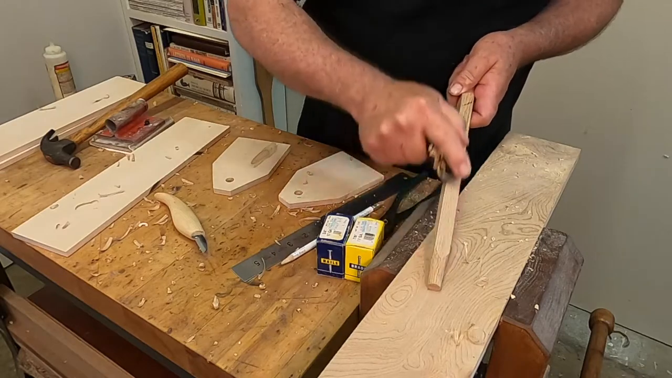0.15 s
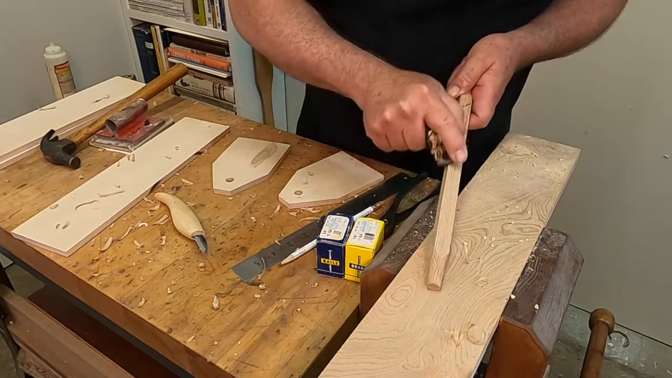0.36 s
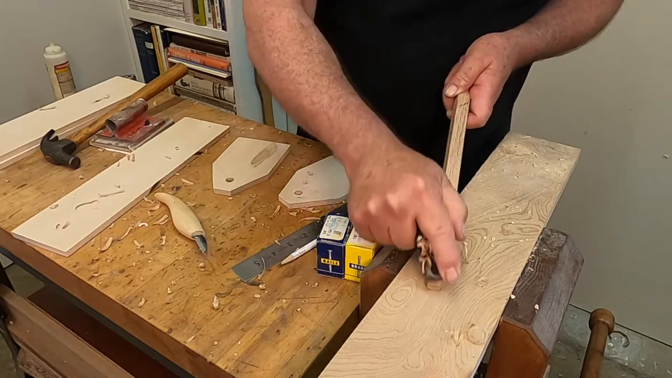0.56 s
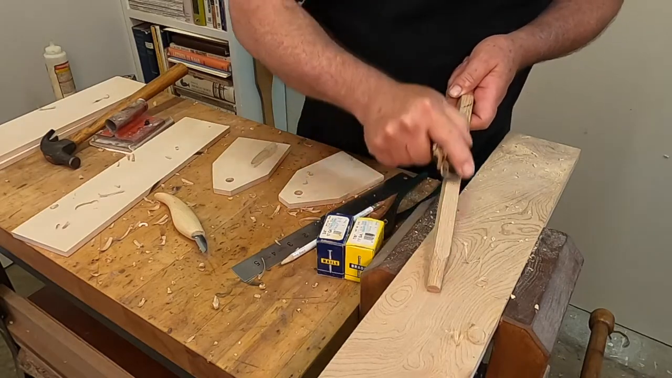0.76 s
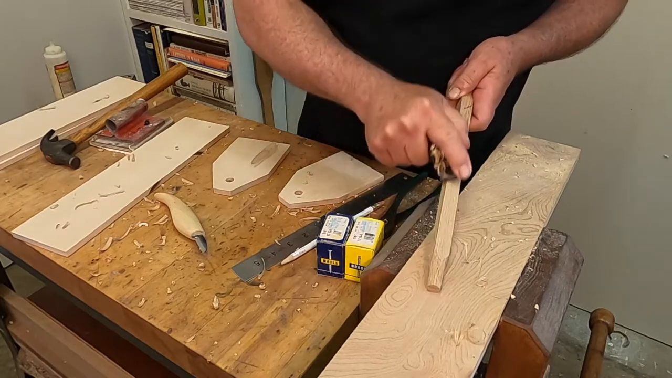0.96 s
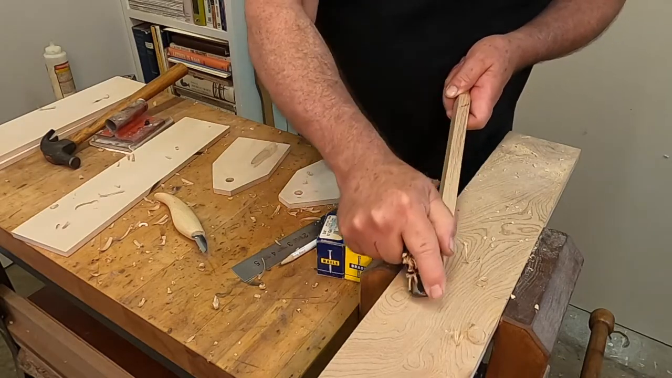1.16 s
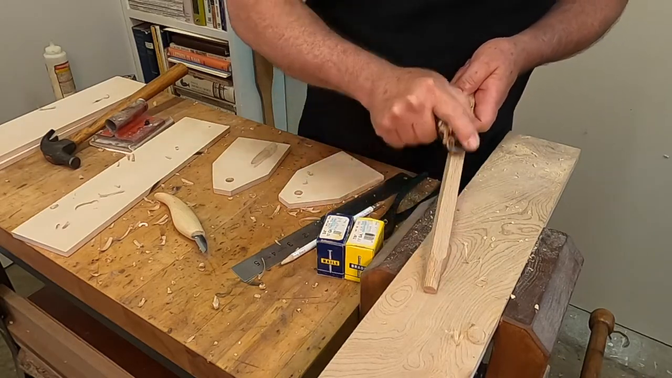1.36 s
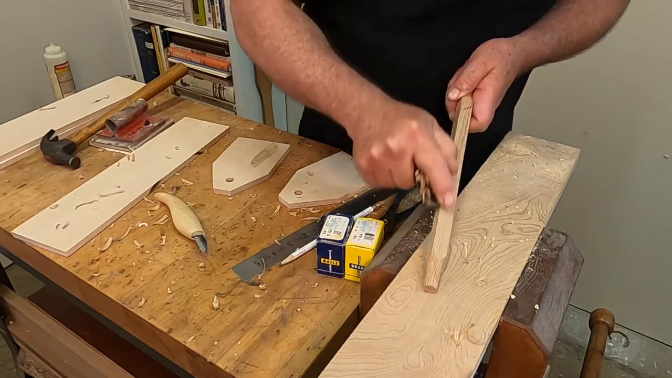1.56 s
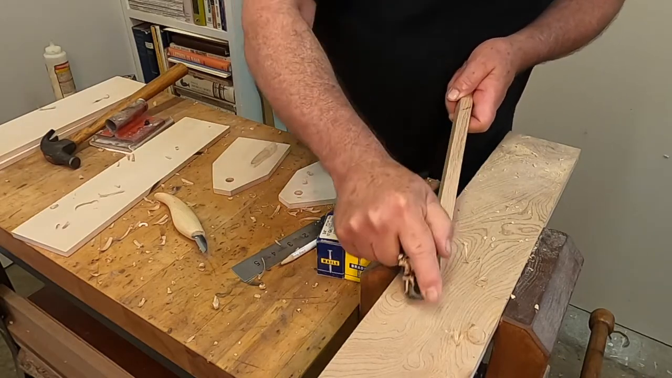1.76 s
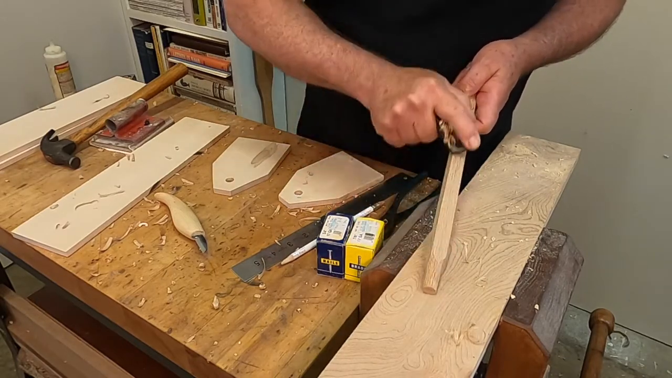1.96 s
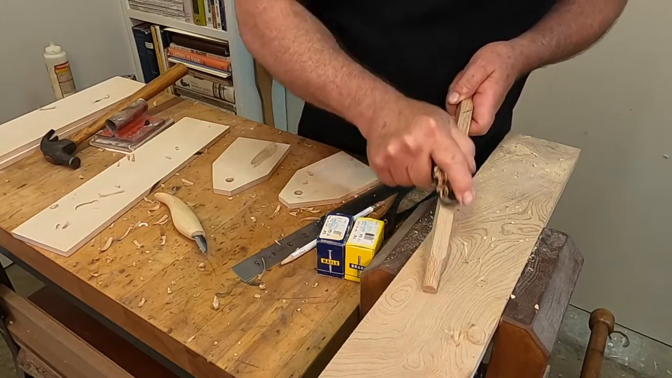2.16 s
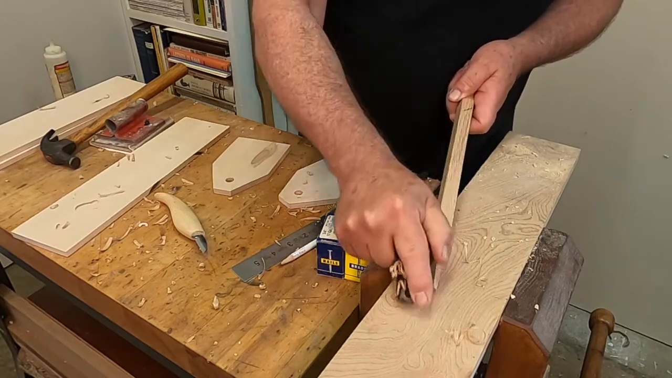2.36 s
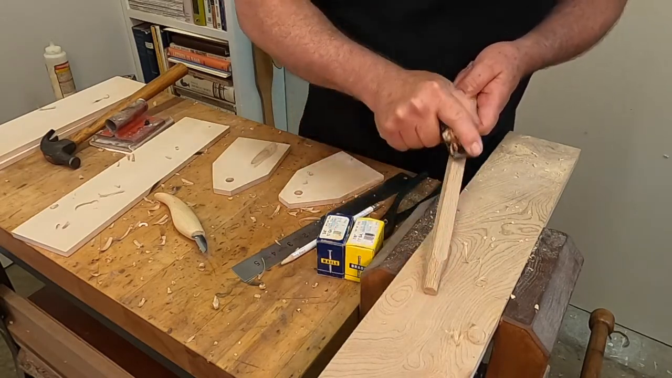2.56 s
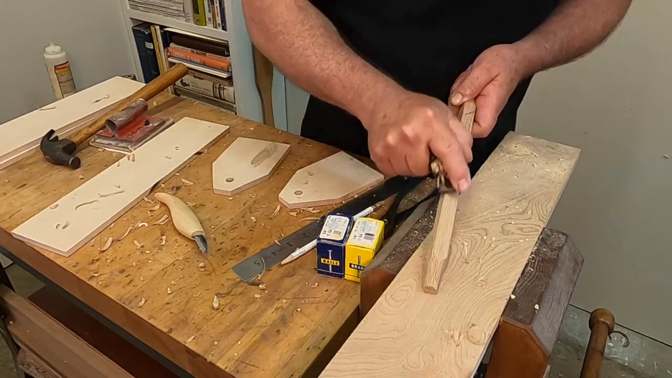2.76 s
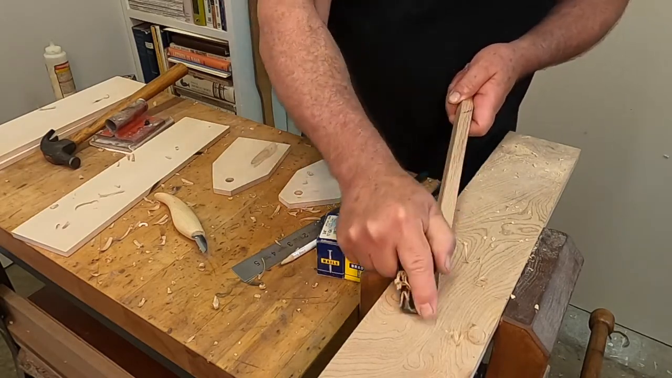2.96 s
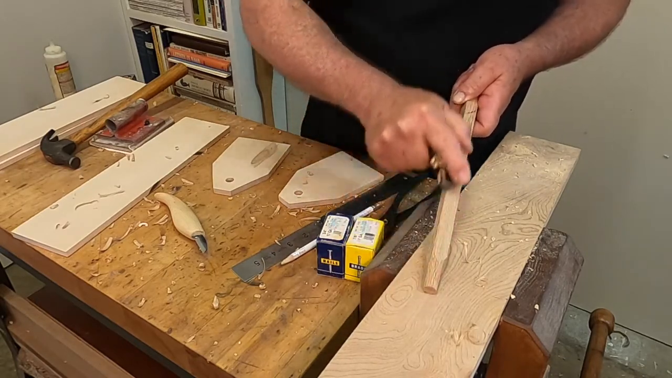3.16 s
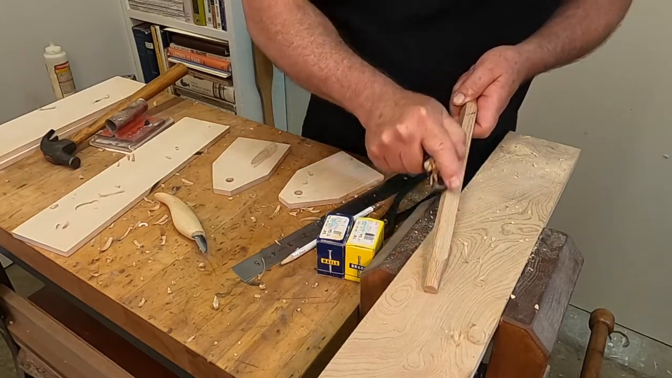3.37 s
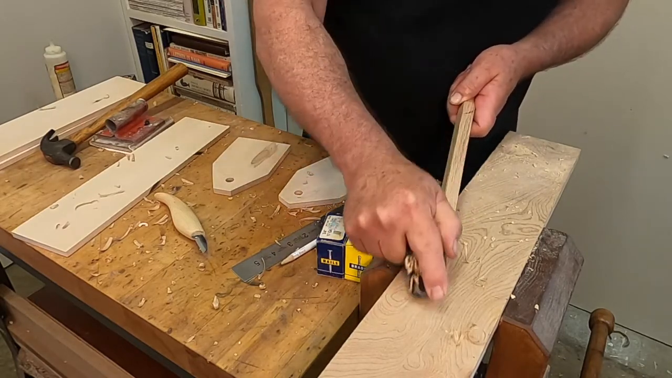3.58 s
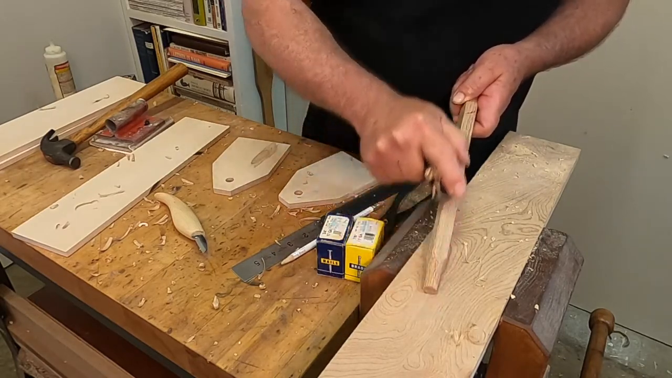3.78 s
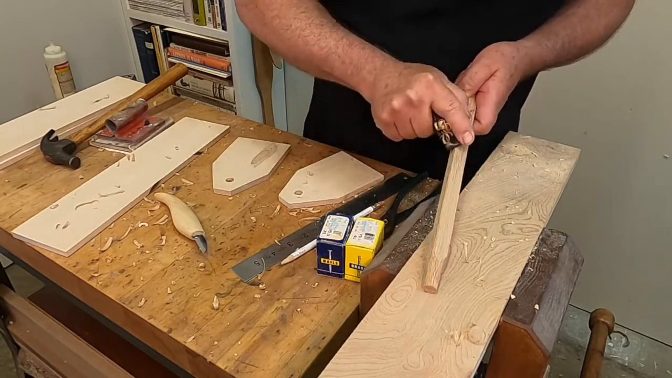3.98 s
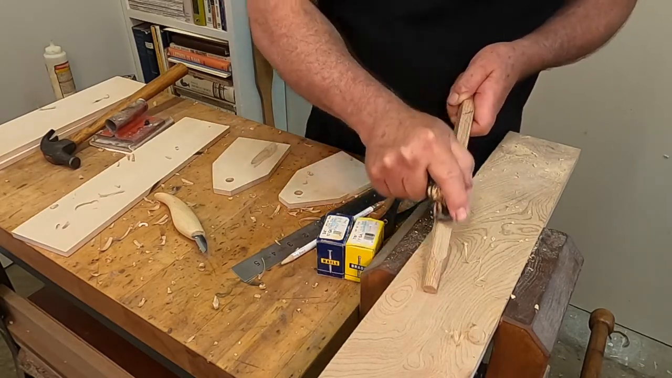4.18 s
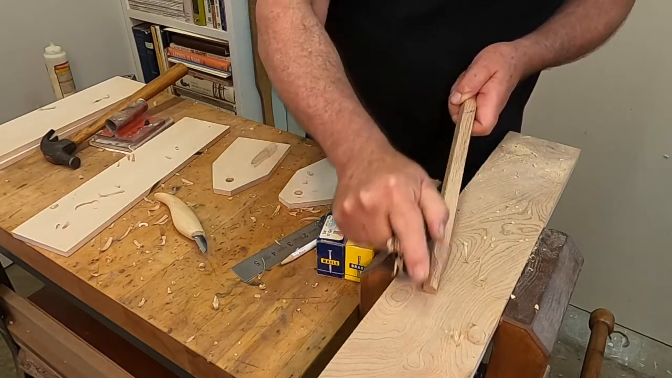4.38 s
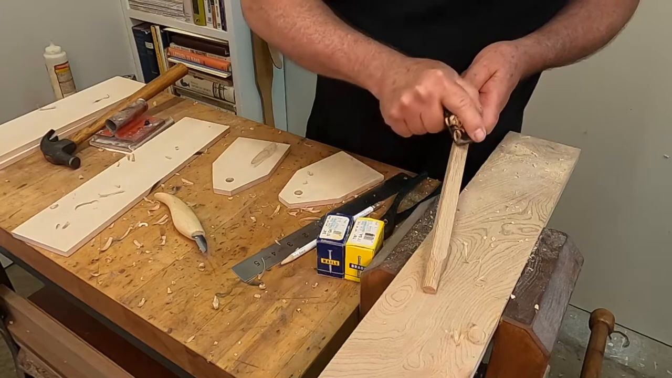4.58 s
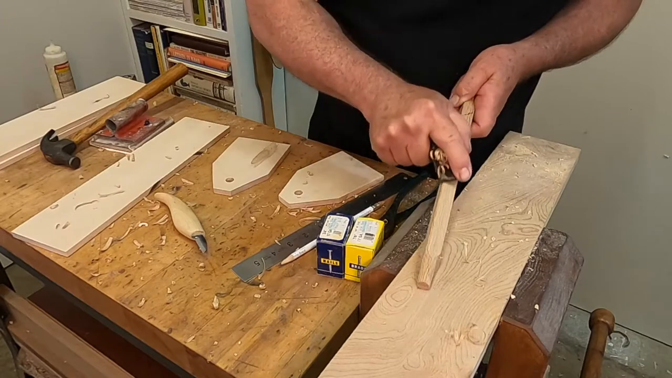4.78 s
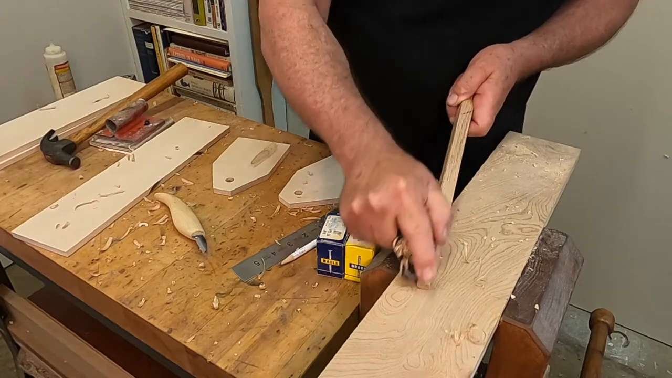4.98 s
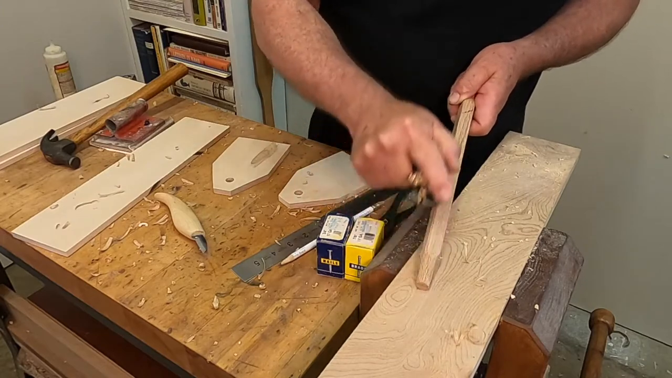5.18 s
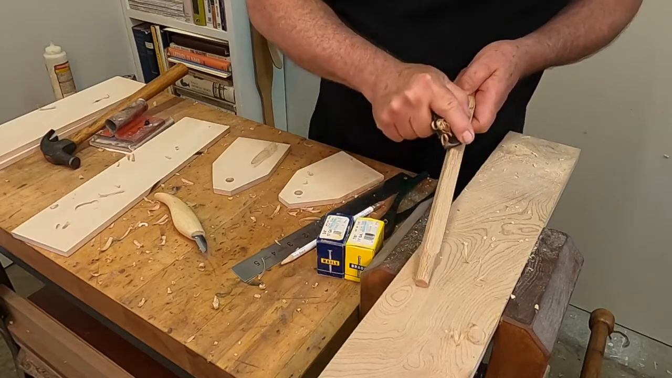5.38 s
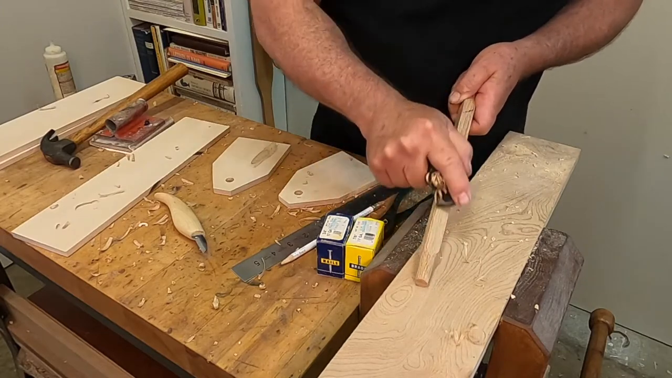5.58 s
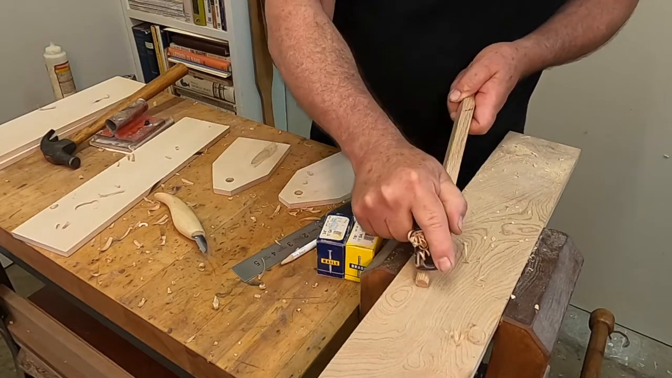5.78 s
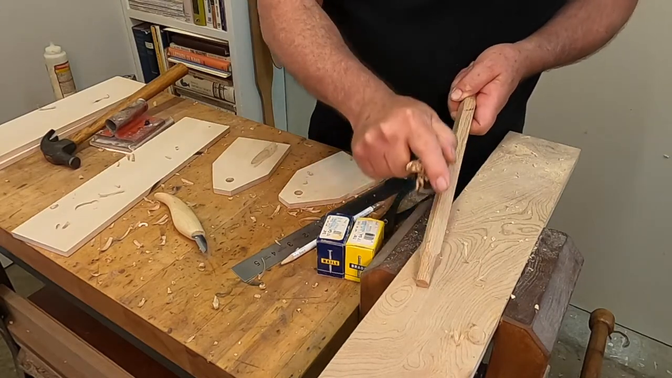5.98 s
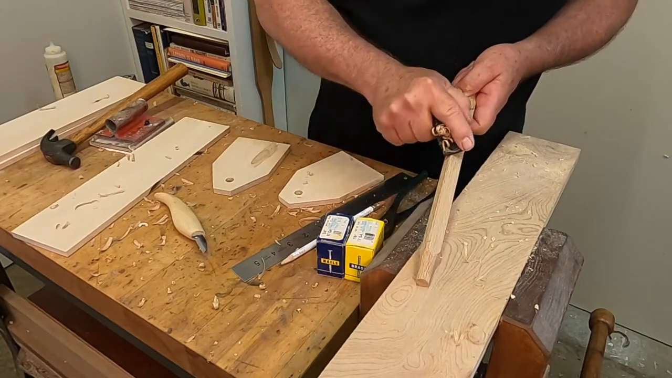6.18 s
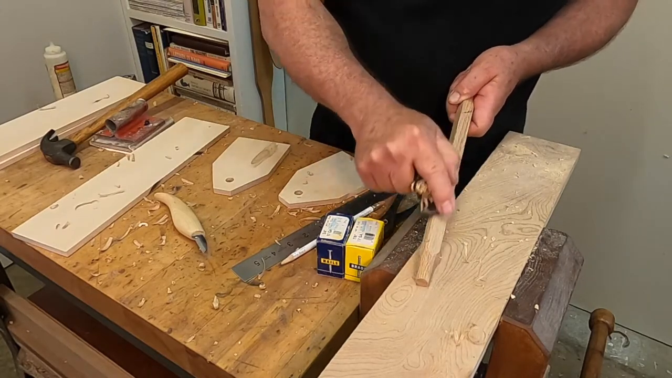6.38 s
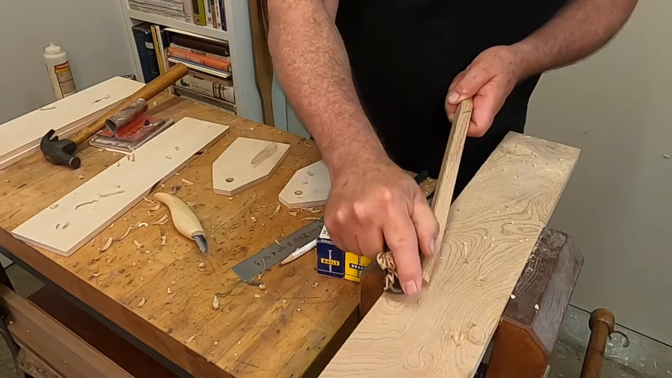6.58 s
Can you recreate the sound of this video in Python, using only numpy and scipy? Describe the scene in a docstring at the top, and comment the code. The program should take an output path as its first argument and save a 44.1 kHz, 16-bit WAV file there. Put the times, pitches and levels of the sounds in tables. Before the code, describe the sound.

Quick hand-planing on a narrow wooden stick: hard knock, short slide, dry crackling shaving scrape, about ten strokes over faint workshop hum.

```python
"""In a workshop, a small hand plane chamfers a thin wooden stick whose far end rests on a board.
Taps of the sole ring damped stick modes; its slide excites mode groups with random friction grains.
The blade tears off shavings: coloured snaps, splinter chirps and rasping glides. Skids, ripples and
run-out scrapes go with each cut. A diffuse room tail follows; hum and rumble lie underneath.
Hard taps clip the recorder and duck its gain."""
import sys
import numpy as np
from scipy import signal
from scipy.fft import rfft, irfft, next_fast_len
from scipy.io import wavfile
from scipy.ndimage import uniform_filter1d, map_coordinates

SR = 44100
rng = np.random.default_rng(int(sys.argv[2]) if len(sys.argv) > 2 else 0)


def store_wav(level_fs):
    """Save 16-bit WAV to argv[1]."""
    pcm = np.round(np.clip(np.atleast_2d(level_fs), -1, 1) * 32767)
    wavfile.write(sys.argv[1], SR, pcm.T.astype(np.int16))


N = 292559
TIME = np.arange(N) / SR  # s

# Mains hum. Each row: frequency in Hz, mean rms level in dB.
HUM_TONES = [(59.6, -43), (120, -56.5), (162, -53)]
# Low workshop rumble, spectrum shape. Each row: frequency in Hz, relative density in dB.
RUMBLE_SHAPE = [(22, 1), (52, -3), (80, -18), (200, -53)]
# Room noise floor, spectrum shape. Each row: frequency in Hz, relative density in dB.
FLOOR_SHAPE = [(45, -2), (90, -3.5), (210, -8), (300, -4), (700, -10), (2000, -19.5), (15000, -34.5)]
# Plane catches on the grain and the stick rings up. Each row: start in seconds, length in seconds,
# low mode gain in dB, upper mode gain in dB, blade gain in dB.
GRAIN_CATCHES = [(-0.01, 0.042, -23, -26.5, -26), (0.083, 0.049, -27, -25.5, -41.5),
                 (0.608, 0.054, -17.5, -23.5, -29.5), (0.812, 0.079, -24.5, -16.5, -30.5),
                 (1.366, 0.12, -23.5, -16.5, -28.5), (2.005, 0.091, -33, -17.5, -38.5),
                 (2.298, 0.083, -12.5, -25, -31), (3.632, 0.035, -17, -19.5, -27.5),
                 (4.896, 0.054, -13, -14.5, -46), (5.761, 0.072, -10.5, -35, -53)]
# Stick's low modes under the sliding sole. Each row: frequency in Hz, width in Hz, relative level in dB.
LOW_RUB_MODES = [(795.4, 23.4, 4), (854, 20, 1.5), (849, 79, 5.5), (978, 66, -9), (1276, 320, -35)]
# Stick's upper modes, likewise. Each row: frequency in Hz, width in Hz, relative level in dB.
UPPER_RUB_MODES = [(1628, 48, 5), (1743, 70, 3), (1988, 72, 1), (2430, 36, -7)]
# Board under the stick. Each row: frequency in Hz, width in Hz, relative level in dB.
BOARD_MODES = [(498.5, 21, 4), (535, 4.6, 6.5), (589, 26, 5), (507, 89, -2.5)]
# Tearing fibres, spectrum shape. Each row: frequency in Hz, relative density in dB.
TEAR_SHAPE = [(900, -48), (1900, -2.5), (2800, 2), (3450, -6), (4350, -1), (5150, -8.5), (7000, -5),
              (8200, -21), (15000, -71)]
# Fizz of the fibres, spectrum shape. Each row: frequency in Hz, relative density in dB.
FIZZ_SHAPE = [(5000, -7.5), (7200, 2.5), (8600, -2), (10300, -3), (11400, -7), (12400, -9), (16000, -24)]
# Sole lands, bounces or slips off the end. Each row: start in seconds, upper mode pitch ratio,
# then relative levels in dB of low mode, upper mode and hard edge.
SOLE_TAPS = [(0.024, 0.96, -23, -23.5, -21), (0.283, 0.91, -19.5, -6, -19), (0.31, 0.95, -10.5, -8.5, -7),
             (0.8, 0.92, -18.5, -17.5, -35), (0.91, 1.05, -43, -17.5, -23), (1.32, 0.95, -10.5, -7, -28),
             (1.98, 0.94, -20.5, -12, -11.5), (1.986, 1.01, -13.5, -6.5, -18),
             (2.6555, 0.91, -12.5, -4.5, -9), (2.658, 1.02, -31, -7.5, -18), (3.051, 1.2, -9.5, -23, -18),
             (3.285, 0.93, -17, -6.5, -18), (3.948, 0.85, -14, -12, -6.5), (3.9495, 1.04, -18, -13.5, -24),
             (3.964, 0.85, -27, -16, -20), (4.42, 1.016, -19, -28, -25.5), (4.681, 0.96, -15, -6.5, -5.5),
             (5.137, 1.04, -18, -33, -25.5), (5.393, 1.04, -13, -11, -6), (5.3965, 0.95, -17, -4, -13),
             (6.205, 0.93, -19.5, -17.5, -29), (6.358, 1.15, -22.5, -23, -29),
             (6.598, 1.02, -20, -12.5, -22)]
# Stick modes rung by a tap, damped by the hand. Each row: frequency in Hz, t60 in seconds,
# build-up time in seconds.
STICK_MODES = [(824.5, 0.045, 0.0011), (1719, 0.015, 0.0023), (2310, 0.0069, 0.00039),
               (3850, 0.015, 0.0006)]
# Decay of the room. Each row: frequency in Hz, t60 in seconds.
ROOM_DECAY = [(200, 0.51), (2600, 0.54), (3100, 0.78), (3700, 0.49), (14000, 0.2)]
# Plane passes. Each row: sole lands in seconds, blade bites in seconds after landing, shaving parts
# in seconds after landing, time to full depth in seconds, glide offset in dB over GLIDE_LEVELS_DB,
# low mode gain in dB, upper mode gain in dB, blade gain in dB, swell from bite to parting in dB,
# relative fizz level in dB, run-out scrape level in dB, bench thud level in dB,
# ripple pitch at top speed in Hz, ripple level in dB ahead of the stick's response.
PLANE_PASSES = [(0.279, 0.108, 0.33, 0.067, 0.5, -24.5, -24.5, -24, 2.5, 2, -27, -39, 1890, -35),
                (0.798, 0.16, 0.41, 0.076, -3.5, -23, -27, -24, 6.5, 3, -35.5, -39, 2614, -40),
                (1.303, 0.21, 0.46, 0.067, -1, -29, -26.5, -25, 14.5, 3, -38, -40, 2486, -44),
                (1.98, 0.15, 0.42, 0.088, 3, -25.5, -23.5, -24, -7, 0.5, -42, -62, 2007, -31),
                (2.654, 0.089, 0.37, 0.12, 4, -25, -26, -21, -4.5, 0.5, -27.5, -29, 1996, -28),
                (3.283, 0.078, 0.35, 0.054, 1, -33.5, -34.5, -28.5, 13.5, 7.5, -33.5, -41, 1800, -42.5),
                (3.95, 0.096, 0.431, 0.051, 2, -22, -25.5, -23, 9, 3, -32.5, -30, 1896, -31),
                (4.679, 0.063, 0.41, 0.12, 3.5, -19.5, -31, -26, 6, 5, -34, -31, 1909, -25.5),
                (5.395, 0.07, 0.45, 0.13, 3, -19, -24, -24, -8.5, 0.5, -22, -54, 1694, -20),
                (6.203, 0.083, 0.38, 0.083, -2.5, -23.5, -27.5, -26, 9, 4.5, -27, -44, 2203, -35)]
# Sole sliding before the bite. Columns: low mode, upper mode and blade gain, all in dB.
GLIDE_LEVELS_DB = (-28.5, -32.5, -48)
# Push peaks in mid-cut. Columns: loss at both ends for low mode, upper mode and blade, all in dB.
ARCH_LOSS_DB = (5.5, 1, 3)
# Rub of the rippled face at a middling speed, spectrum shape. Each row: frequency in Hz,
# relative density in dB.
RIPPLE_SHAPE = [(520, -22.5), (1000, 2), (1350, -6.5), (2400, -37)]
# How the stick passes the ripple rub on. Each row: frequency in Hz, gain in dB.
STICK_RESPONSE = [(600, -3.5), (880, 1), (1250, -10), (1700, 1.5), (2600, -3.5)]
# Shaving chatters as it curls. Each row: start in seconds, length in seconds, start pitch in Hz,
# end pitch in Hz, level in dB.
SHAVING_RASPS = [(0.446, 0.013, 4250, 3830, -16.5), (1.06, 0.04, 4350, 5480, -17.5),
                 (2.23, 0.023, 5010, 2600, -16), (2.325, 0.029, 3947, 4223, -18.5),
                 (2.95, 0.05, 4540, 3245, -20.5), (3.579, 0.048, 4850, 3303, -16),
                 (5.012, 0.04, 4245, 3862, -16.5), (6.532, 0.032, 4260, 3960, -14.5)]
# Thud of the bench, spectrum shape. Each row: frequency in Hz, relative density in dB.
BENCH_SHAPE = [(85, -13), (150, 18), (300, -1), (900, -53)]

CATCH_EDGE_S = 0.0099  # rise and fall of a catch
SETTLE_S = 0.0034  # sole settles on the wood
STICK_LAG_RATIO = 0.91  # build-up time of the stick's rub over that of the cut
TOP_HZ = 16000


def amp(db):
    """Decibels to gain."""
    return 10 ** (np.asarray(db) / 20)


def unit(x):
    """x at rms 1."""
    return x / np.sqrt(np.mean(x ** 2) + 1e-20)


def along(points, hz):
    """(Hz, value) points read on a log axis."""
    f, v = np.transpose(points)
    return np.interp(np.log(hz + 1), np.log(f), v)


def ramp(u):
    """Smooth step from 0 to 1 as u goes from 0 to 1."""
    return np.sin(np.pi / 2 * np.clip(u, 0, 1)) ** 2


def wobble(rate_hz):
    """Smooth random curve, rate_hz knots a second."""
    knots = rng.standard_normal(int(N * rate_hz / SR) + 4)
    return map_coordinates(knots, [TIME * rate_hz])


def filtered(x, response):
    """x times a response of frequency, through the FFT."""
    size = next_fast_len(N + SR // 2)
    return irfft(rfft(x, size) * response(np.fft.rfftfreq(size, 1 / SR)), size)[:N]


def coloured(x, spectrum):
    """x through a (Hz, dB) spectrum, at rms 1."""
    return unit(filtered(x, lambda hz: amp(along(spectrum, hz))))


def background():
    """Uneven workshop rumble, noise floor and the wavering hum of mains equipment."""
    hum = np.zeros(N)
    for hz, db in HUM_TONES:
        level = amp(db + 2.5 * wobble(rate_hz=7)) * np.sqrt(2)
        hum += level * np.sin(2 * np.pi * hz * TIME + 0.91 * wobble(rate_hz=3.66))
    rumble_gain = amp(-55 + 2.7 * wobble(rate_hz=4.46))
    rumble = rumble_gain * coloured(rng.standard_normal(N), RUMBLE_SHAPE)
    floor_gain = amp(-44.0 + 2.96 * wobble(rate_hz=6.2))
    return hum + rumble + floor_gain * coloured(rng.standard_normal(N), FLOOR_SHAPE)


def catches():
    """Gains of low mode, upper mode and blade while the plane catches on the grain."""
    gains = np.zeros((3, N))
    for start_s, length_s, *levels_db in GRAIN_CATCHES:
        span = (TIME >= start_s) & (TIME < start_s + length_s)
        t = TIME[span] - start_s
        edges = ramp(np.minimum(t, length_s - t) / CATCH_EDGE_S)
        gains[:, span] += amp(levels_db)[:, None] * edges
    return gains


def grit(rate_hz, spread_db):
    """Tiny fibre snaps at random moments, a few much larger than the rest."""
    snaps = rng.random(N) < rate_hz / SR
    return snaps * rng.standard_normal(N) * amp(spread_db * rng.standard_normal(N))


def rubbed(modes, skirt_hz):
    """Friction grains ring a group of neighbouring modes; rms 1."""
    def peak(f, centre_hz, width_hz):
        return 1j * f * width_hz / (centre_hz ** 2 - f ** 2 + 1j * f * width_hz)

    rings = np.zeros(N)
    for hz, width_hz, db in modes:
        grains = grit(rate_hz=2500, spread_db=5.0)
        rings += filtered(grains, lambda f: amp(db) * peak(f, hz, width_hz) * peak(f, hz, skirt_hz))
    return unit(rings)


def sole(low_gain, upper_gain, blade_gain, loaded_db):
    """The sliding sole rubs the stick's modes; the push of the cut also shakes the board beneath."""
    # lightly touched, the stick rings in its first modes; a biting blade spreads the ring over all
    load = blade_gain / (blade_gain + amp(loaded_db))

    def blend(modes, free_count, skirt_hz):
        free = rubbed(modes[:free_count], skirt_hz)
        pressed = rubbed(modes, skirt_hz)
        return np.sqrt(1 - load) * free + np.sqrt(load) * pressed

    low = blend(LOW_RUB_MODES, free_count=1, skirt_hz=440)
    upper = blend(UPPER_RUB_MODES, free_count=2, skirt_hz=1130)
    board_gain = amp(-13.5) * np.sqrt(low_gain * blade_gain)
    board = board_gain * rubbed(BOARD_MODES, skirt_hz=597)
    stick_slip = amp(2.27 * wobble(rate_hz=75))  # sole catches and slips on the grain
    return stick_slip * (low_gain * low + upper_gain * upper + board)


def patchy(x, depth_db):
    """The colour of x shifts from moment to moment as the wood grain passes."""
    z = signal.stft(x, nperseg=256)[2]
    across_hz = uniform_filter1d(rng.standard_normal(z.shape), size=6, axis=0)
    field = uniform_filter1d(across_hz, size=5, axis=1)
    return signal.istft(z * amp(depth_db * unit(field)), nperseg=256)[1][:N]


def glides(rows, width_hz):
    """Rough chirps: narrow chatter gliding in pitch; rows (s, length s, start Hz, end Hz, dB)."""
    out = np.zeros(N)
    chatter = unit(wobble(width_hz)) + 1j * unit(wobble(width_hz))
    for start_s, length_s, start_hz, end_hz, db in rows:
        span = slice(*np.searchsorted(TIME, [start_s, start_s + length_s]))
        u = (TIME[span] - start_s) / length_s
        phase = 2 * np.pi * np.cumsum(start_hz + (end_hz - start_hz) * u) / SR
        envelope = amp(db) * np.sqrt(np.abs(np.sin(np.pi * u)))
        out[span] += envelope * np.real(chatter[span] * np.exp(1j * phase))
    return out


def splinters(centre_hz, spread, length_s, count):
    """Clumps of fibres give way in turn, each a brief chirp of its own pitch and size; rms 1."""
    starts_s = np.linspace(0, TIME[-1], count) + rng.normal(0, length_s, count)
    draws = np.clip(rng.standard_normal((count, 3)), -2, 2)
    rows = []
    for start_s, (pitch, slope, size) in zip(starts_s, draws):
        start_hz = centre_hz * np.exp(spread * pitch)
        end_hz = start_hz * np.exp(.15 * slope)
        rows.append((start_s, length_s * np.exp(.4 * size), start_hz, end_hz, 3 * size))
    return unit(glides(rows, width_hz=900))


def current_pass():
    """Columns of the pass under way, one value per sample."""
    columns = np.transpose(PLANE_PASSES)
    return columns[:, np.clip(np.searchsorted(columns[0], TIME) - 1, 0, None)]


def blade(gain):
    """Fibres tear in uneven bursts, splinter in clumps more as the gain rises, and fizz."""
    fizz_db = current_pass()[9]
    bursts_db = 1.67 * wobble(rate_hz=70)
    tearing = coloured(patchy(grit(rate_hz=3500, spread_db=2.5), depth_db=4.0), TEAR_SHAPE)
    clumps = coloured(splinters(centre_hz=3723, spread=.34, length_s=.012, count=500), TEAR_SHAPE)
    share = .5 * gain / (gain + amp(-29))  # power share of the clumps
    hiss = coloured(patchy(grit(rate_hz=8300, spread_db=-0.5), depth_db=2.0), FIZZ_SHAPE)
    fizz = amp(fizz_db - 14.0) * hiss
    return gain * amp(bursts_db) * (np.sqrt(1 - share) * tearing + np.sqrt(share) * clumps + fizz)


def taps(ring_db, crack_db, crack_t60_s, top_mode_db):
    """Contacts ring the stick; landing spot shifts the upper pitch, a hard edge wakes the top two."""
    out, t = np.zeros(N + SR), np.arange(SR // 8) / SR
    for start_s, ratio, low_db, upper_db, edge_db in SOLE_TAPS:
        hit = amp(edge_db + crack_db - 60 * t / crack_t60_s) * rng.standard_normal(len(t))
        hit = signal.lfilter([1 / 3], [1, -2 / 3], hit)  # wood softens the crack
        levels_db = (low_db, upper_db, edge_db, edge_db + top_mode_db)
        modes = zip(STICK_MODES, levels_db, (1, ratio, 1, 1))
        for order, ((hz, t60_s, build_s), db, shift) in enumerate(modes):
            swell = amp(-60 * t / t60_s) * (1 - np.exp(-t / build_s))
            pitch_hz = hz * shift * (1 + .012 * rng.standard_normal())
            level = (-1) ** order * amp(db + ring_db)  # signs alternate
            hit += level * swell / swell.max() * np.sin(2 * np.pi * pitch_hz * t)
        out[round(start_s * SR):][:len(t)] += hit
    return out[:N]


def room(x, decay):
    """x through a diffuse echo 4 ms later; decay(Hz) is its t60 in seconds."""
    hz, t, z = signal.stft(rng.standard_normal(SR // 2), SR, nperseg=256)
    tail = signal.istft(z * amp(-60 * t / decay(hz)[:, None]), SR, nperseg=256)[1]
    return signal.fftconvolve(x, np.pad(tail / np.linalg.norm(tail), (SR // 250, 0)))[:N]


def strokes(lift_db_per_s, drop_db, fade_db_per_s):
    """Gains of low mode, upper mode and blade: glide, bite, an arched push, release."""
    land, bite, part, rise, glide_db, low_db, upper_db, blade_db, swell_db = current_pass()[:9]
    t = TIME - land
    progress = np.clip((t - bite) / (part - bite), 0, 1)
    since = np.maximum(t - part, 0)
    contact = ramp(t / SETTLE_S)
    depth = ramp((t - bite) / rise)
    pressure = ramp((t - bite) / (rise * STICK_LAG_RATIO))
    lifted = amp(-lift_db_per_s * since)
    parted = amp(-drop_db * (since > 0) - fade_db_per_s * since)
    layers = [(low_db, pressure, lifted), (upper_db, pressure, lifted), (blade_db, depth, parted)]
    gains = []
    for (db, attack, release), base_db, arch_db in zip(layers, GLIDE_LEVELS_DB, ARCH_LOSS_DB):
        push = amp(db + swell_db * (progress - .5) - arch_db * (2 * progress - 1) ** 2)
        gains.append(contact * release * np.hypot(amp(base_db + glide_db), attack * push))
    return np.array(gains)


def skids(length_s, start_hz, end_hz, skid_db):
    """Just as the blade bites, the sole skids with rising pitch."""
    rows = [(land + bite - length_s / 2, length_s, start_hz, end_hz, skid_db)
            for land, bite, *_ in PLANE_PASSES]
    return glides(rows, width_hz=360)


def ripples(slow_hz, coast_s):
    """Ripples of the cut face rub broadly through the stick, pitch following the plane's speed."""
    land, bite, part, *_, top_hz, ripple_db = current_pass()
    u = np.clip((TIME - land - bite) / (part + coast_s - bite), 0, 1)
    hz = slow_hz + (top_hz - slow_hz) * np.sin(np.pi * u) ** 2
    face = coloured(grit(rate_hz=4000, spread_db=3.5), RIPPLE_SHAPE)
    travelled = np.cumsum(hz / RIPPLE_SHAPE[1][0])  # samples of face passed over
    envelope = amp(ripple_db) * np.sqrt(np.abs(np.sin(np.pi * u)))
    rub = envelope * map_coordinates(face, [travelled], mode="wrap")
    return filtered(rub, lambda f: amp(along(STICK_RESPONSE, f)))


def rasps():
    """The shaving chatters in a narrow gliding band as it curls."""
    return glides(SHAVING_RASPS, width_hz=1300)


def run_out(length_s, start_hz, end_hz):
    """After each cut the heel scrapes off the tip with falling pitch; the bench thuds softly."""
    scrapes, thud = [], np.zeros(N)
    for land, _, part, *_, scrape_db, thud_db, _, _ in PLANE_PASSES:
        scrapes.append((land + part, length_s, start_hz, end_hz, scrape_db))
        t = np.maximum(TIME - land - part - .03, 0)
        thud += amp(thud_db - 60 * t / 0.5) * (1 - np.exp(-t / 0.022))
    return glides(scrapes, width_hz=440) + thud * coloured(rng.standard_normal(N), BENCH_SHAPE)


def scene():
    """Planing and taps; bench and near walls answer the taps, then the room dies away."""
    stroke_gains = strokes(lift_db_per_s=600, drop_db=13.5, fade_db_per_s=99)
    low, upper, cutting = np.hypot(stroke_gains, catches())
    rubbing = sole(low, upper, cutting, loaded_db=-36.5) + ripples(slow_hz=563.6, coast_s=.09)
    sliding = skids(length_s=0.127, start_hz=1725, end_hz=2300, skid_db=-36)
    sliding += run_out(length_s=0.1253, start_hz=760, end_hz=557)
    planing = rubbing + sliding + blade(cutting) + rasps()
    knocks = taps(ring_db=8.5, crack_db=-10.0, crack_t60_s=0.027, top_mode_db=-18)
    near = amp(-13.5) * room(knocks, lambda hz: np.full_like(hz, .09))
    far_send = amp(-10.0) * planing + amp(-15) * knocks
    far = room(far_send, lambda hz: along(ROOM_DECAY, hz))
    return (planing + knocks + near + far + background())[None]


def ducked(x, threshold_db, attack_s, release_db_per_s):
    """Gain control: turns down a few ms after a loud sound, then recovers at a steady dB rate."""
    keep = np.exp(-1 / (attack_s * SR))
    level_db = 20 * np.log10(signal.lfilter([1 - keep], [1, -keep], np.abs(x)) + 1e-9)
    recovery_db = release_db_per_s * TIME
    held_db = np.maximum.accumulate(level_db + recovery_db) - recovery_db
    return x * amp(-np.maximum(held_db - threshold_db, 0))


def record(dry):
    """Gain control too slow for the taps, which clip softly; nothing is kept from TOP_HZ up."""
    x = ducked(dry[0], threshold_db=-13.5, attack_s=0.006, release_db_per_s=31.5)
    knee = 8  # higher is harder
    clipped = x / (1 + np.abs(x) ** knee) ** (1 / knee)
    return filtered(clipped, lambda hz: hz < TOP_HZ)[None]


dry = scene()
out = record(dry)
store_wav(out)
```